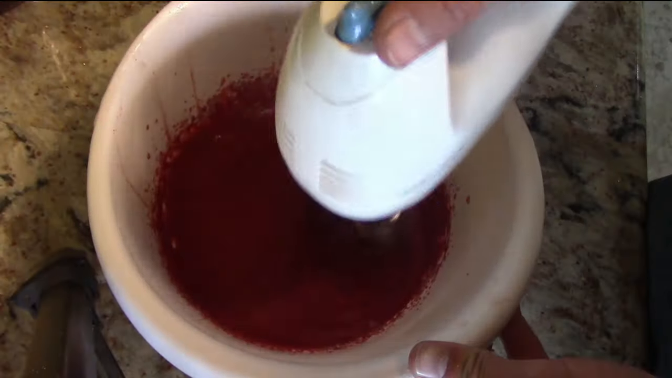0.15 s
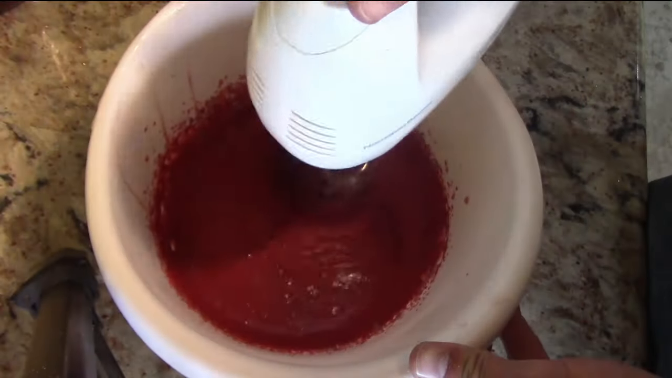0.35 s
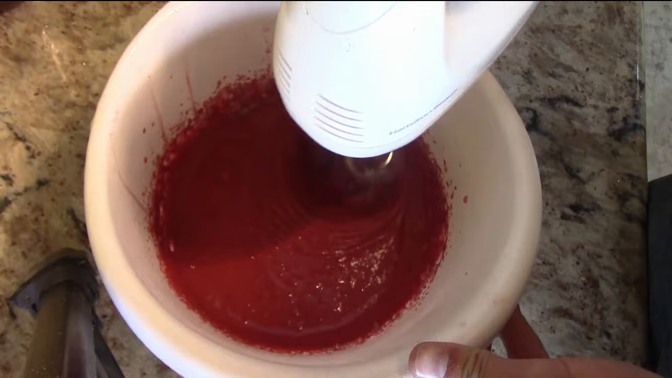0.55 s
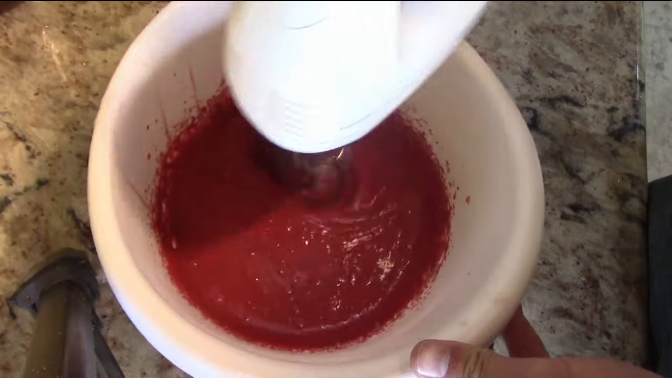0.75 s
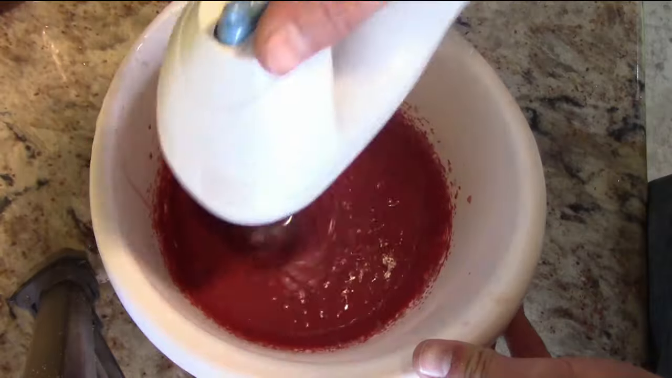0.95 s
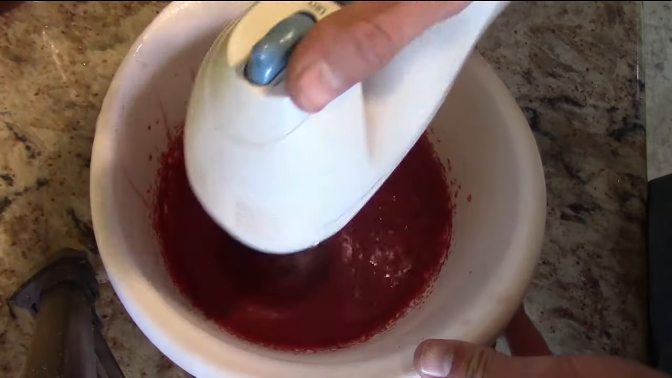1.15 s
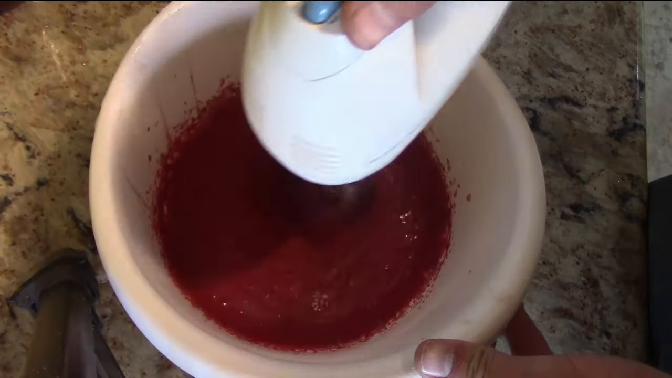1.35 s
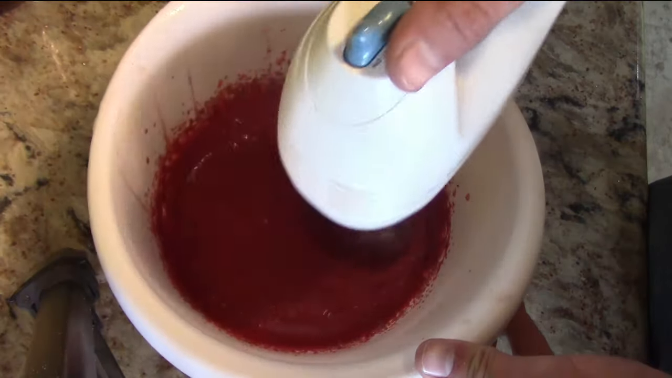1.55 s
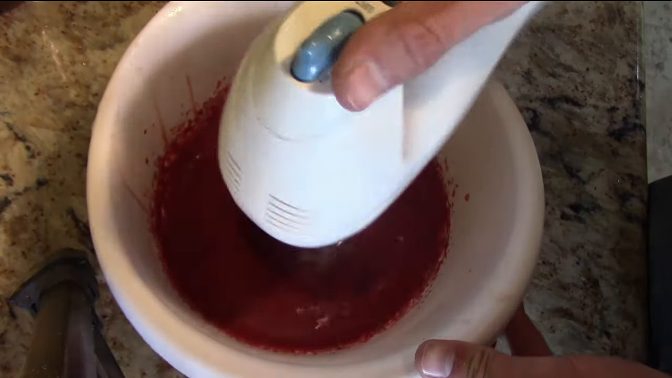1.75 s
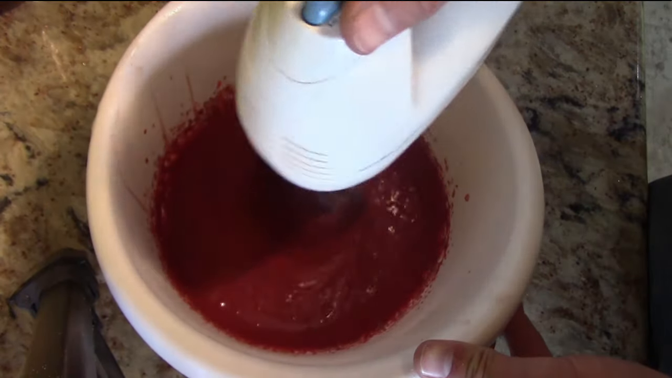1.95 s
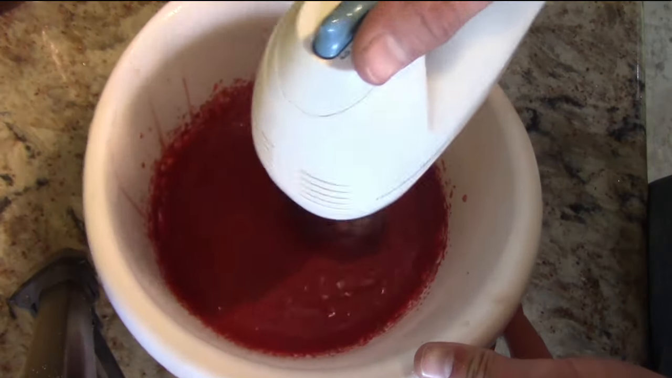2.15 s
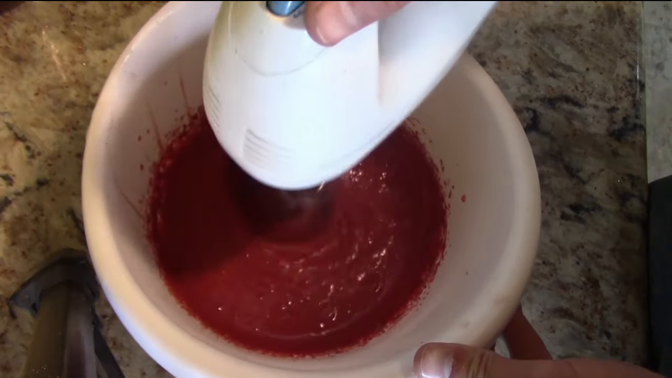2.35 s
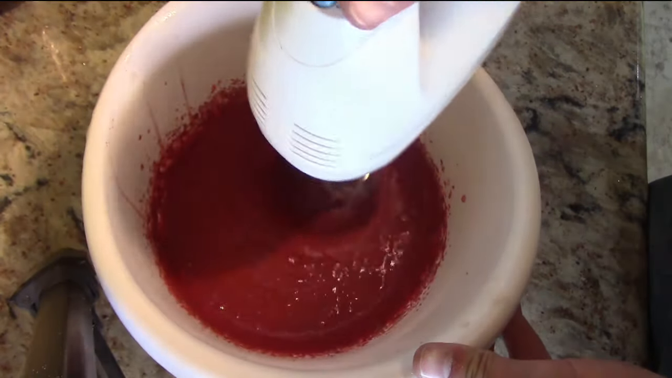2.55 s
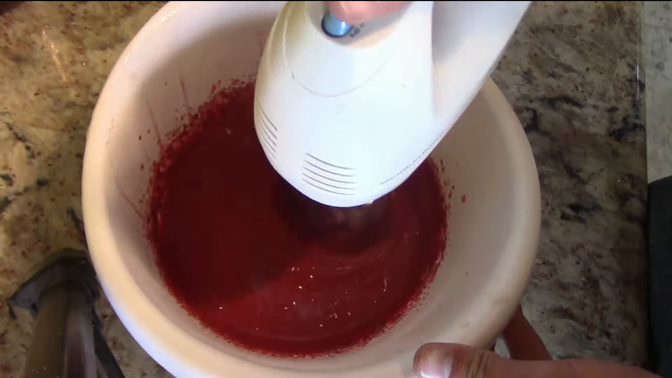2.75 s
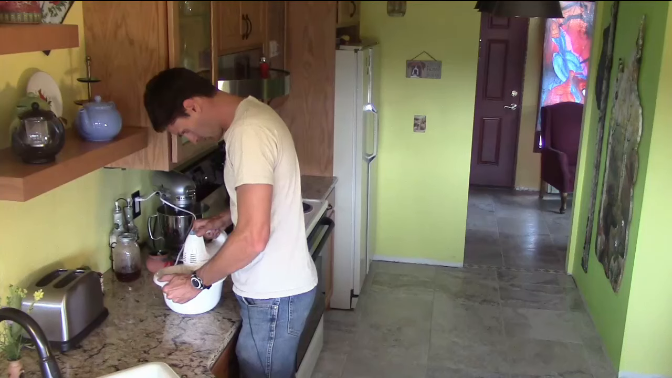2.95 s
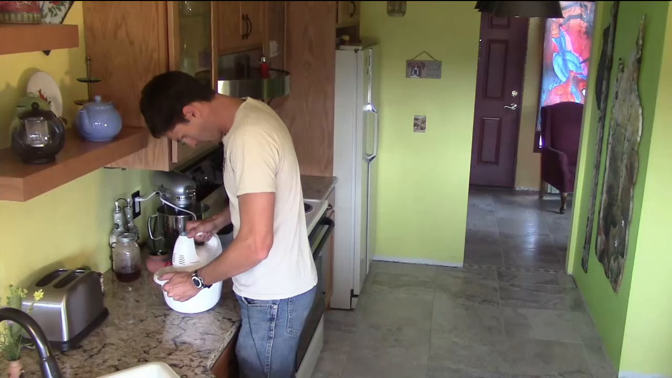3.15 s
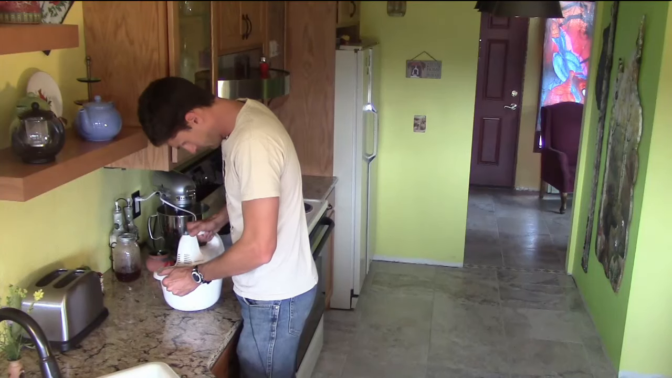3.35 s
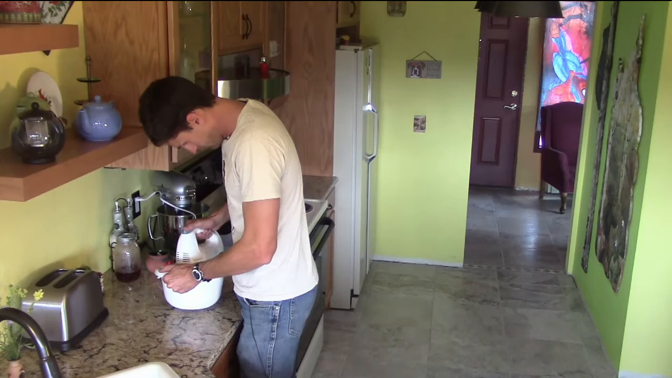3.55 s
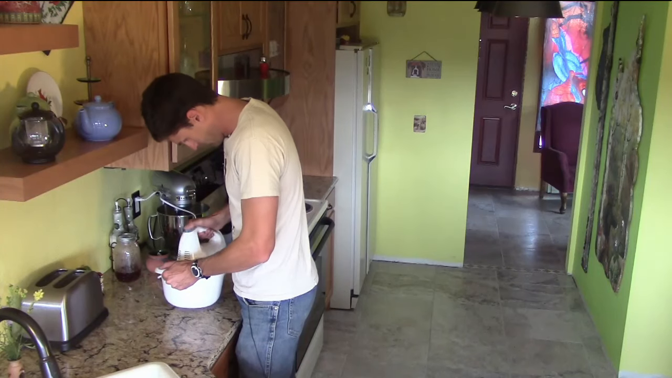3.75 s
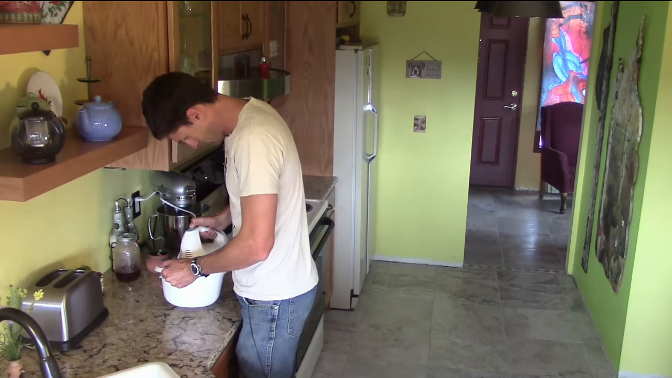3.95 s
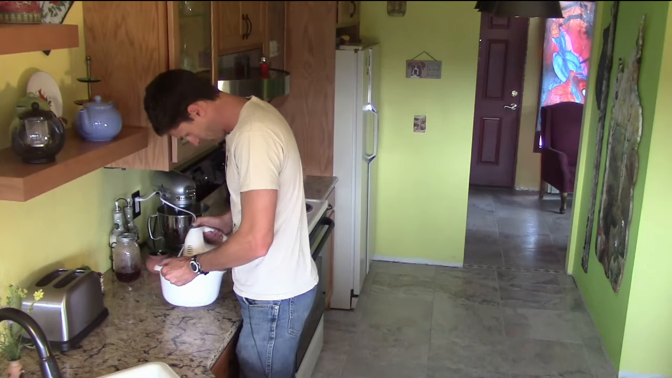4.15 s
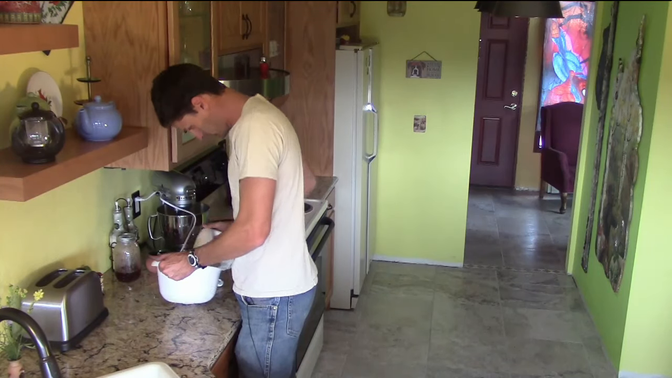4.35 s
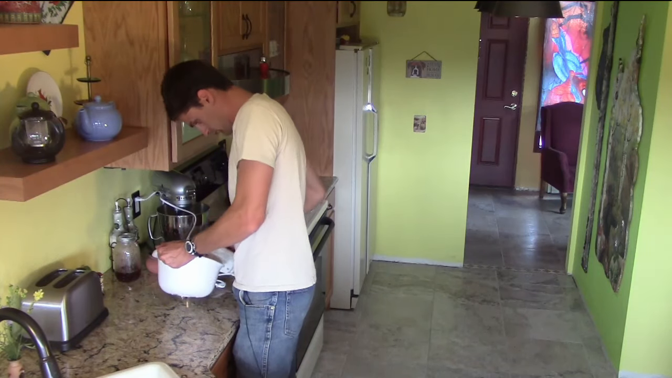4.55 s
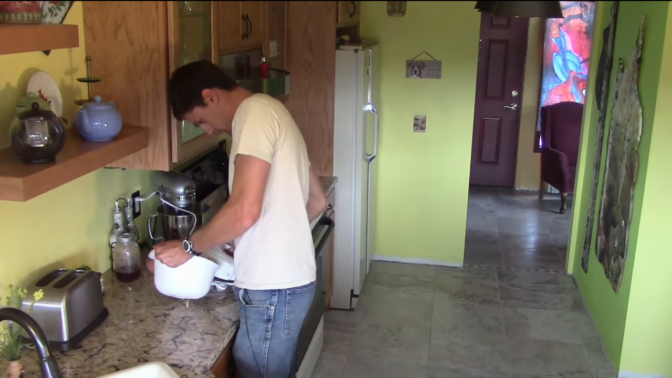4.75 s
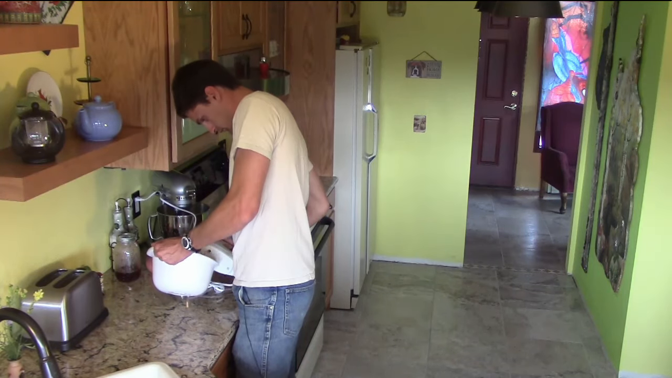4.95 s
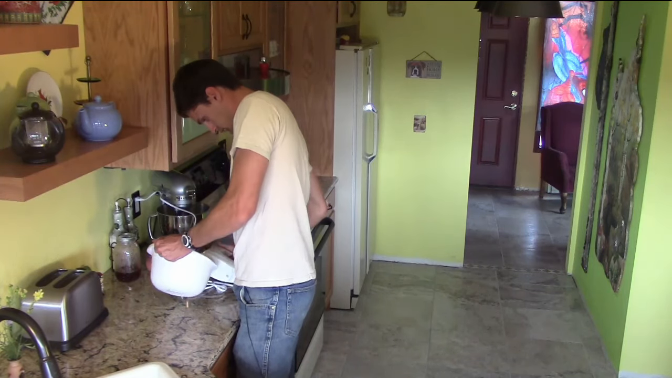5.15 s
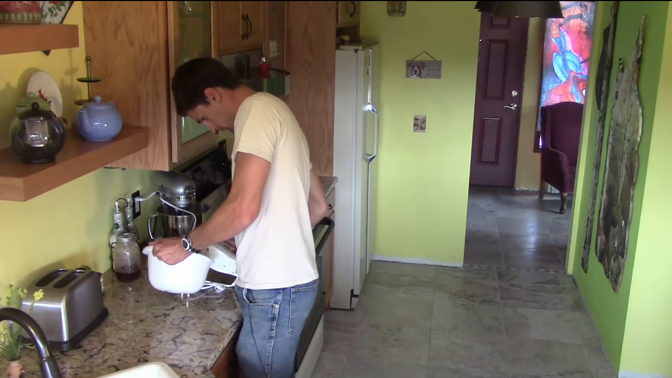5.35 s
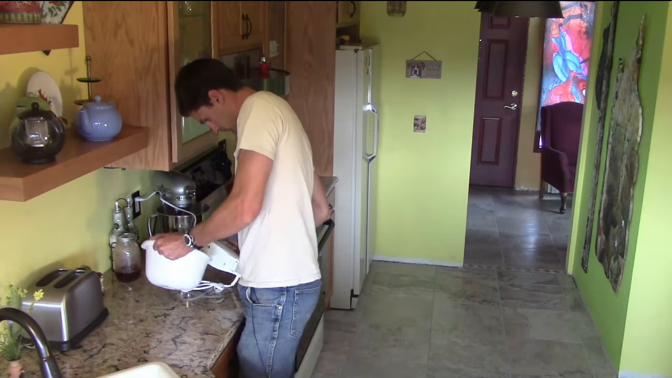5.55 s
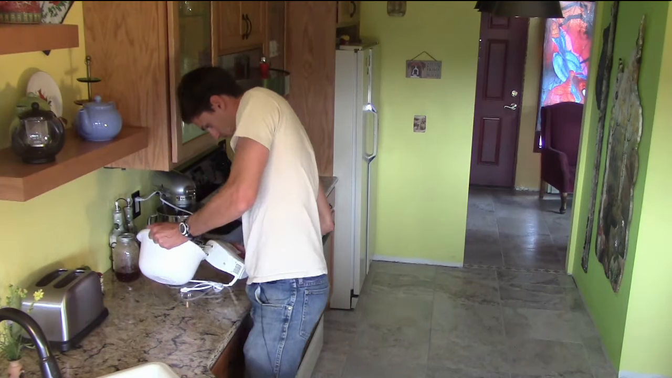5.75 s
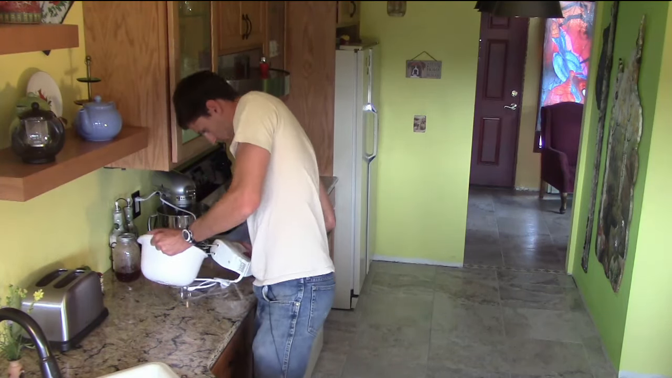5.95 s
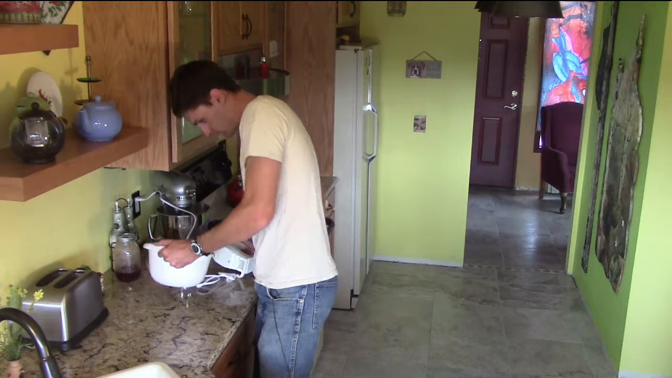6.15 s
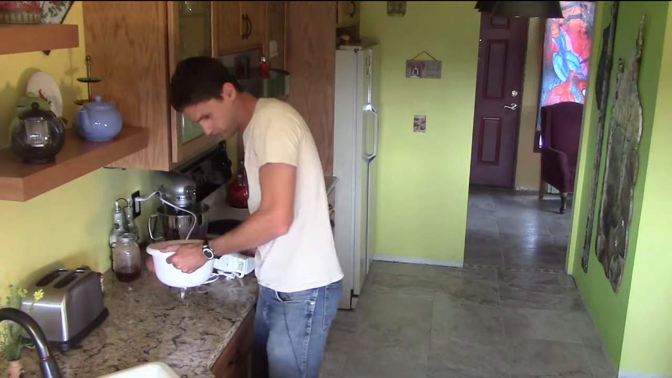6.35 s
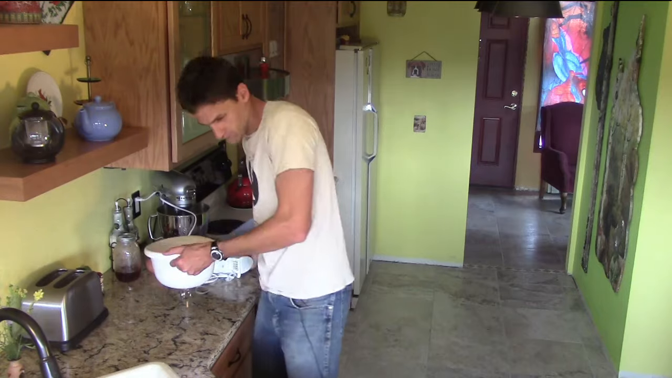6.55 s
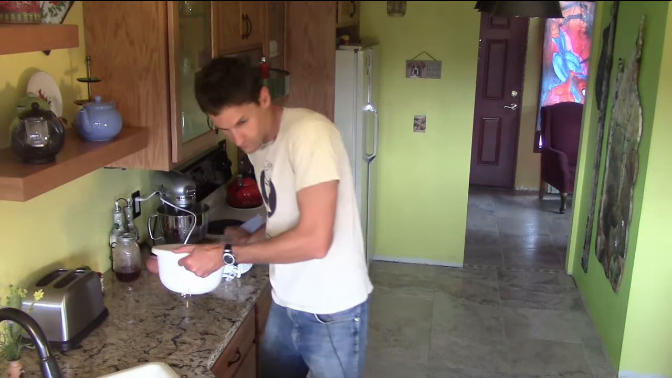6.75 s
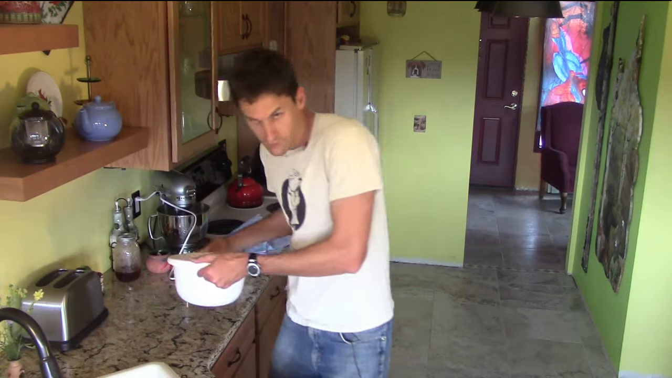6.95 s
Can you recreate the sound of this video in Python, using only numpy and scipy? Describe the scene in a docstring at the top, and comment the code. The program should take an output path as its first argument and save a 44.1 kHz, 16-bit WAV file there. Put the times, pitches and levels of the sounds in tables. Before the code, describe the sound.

Close, buzzy motor hum with rushing air and wavering high whine, heard above a bowl, swells in and holds steady. Around three seconds it gives way to the same mixer across a small lively kitchen. It is turned off and whines downward while clacks begin on the counter; later come a faint squeak, a sharper knock or two and low fabric thumps against the microphone.

```python
"""Hand mixer in a plastic bowl

A mixer beats batter, heard close above the bowl, then cross-faded to a kitchen-wide view where it is
switched off and coasts down. Motors are sums of shaft orders plus coloured air noise; beaters excite wall modes.
Mixer and bowl are set down on stone as short rough pushes into resonant modes and shifted as filtered noise.
Clothing rumbles, rustles and thumps at a single microphone over a faint room hush.
"""
import sys
import numpy as np
from scipy import signal
from scipy.fft import rfft, irfft, next_fast_len
from scipy.io import wavfile
from scipy.ndimage import uniform_filter1d, map_coordinates

SR = 44100
rng = np.random.default_rng(int(sys.argv[2]) if len(sys.argv) > 2 else 0)


def store_pcm(level_fs):
    """Save levels as 16-bit WAV."""
    pcm = np.round(np.clip(level_fs, -1, 1) * 32767).astype(np.int16)
    wavfile.write(sys.argv[1], SR, np.atleast_2d(pcm).T)


def natural_amplitude(level_db):
    """Convert a level in decibels to a linear amplitude factor, elementwise."""
    exponent = np.asarray(level_db, float) / 20
    return 10 ** exponent


N = 312669
LAST_FADE_S = [5.44, 7.26]  # hush and steady clothing rumble: silent, full

# noise colours, scaled to rms 1 in use: freq_hz, relative_density_db
HUSH_COLOUR = [(40, -65), (180, -19), (300, 3), (681, -8), (1750, -14.5), (3920, -22), (8000, -26.5),
               (12400, -32.5), (13200, -49.5)]
CLOTH_COLOUR = [(8.8, -15), (15, 3), (32, -6), (238, -18.5), (402, -30), (530, -34), (600, -39), (780, -62),
                (1320, -120)]
RUSTLE_COLOUR = [(120, -16), (250, 1), (500, -4), (800, -7), (1400, -20), (3000, -34), (8000, -37),
                 (14000, -70)]
SLIDING_COLOUR = [(300, -28), (900, -12), (1500, -4), (2300, -3), (3000, -2), (3750, -2), (4300, -15),
                  (6500, -22), (9000, -35), (15000, -60)]
FAR_AIR_COLOUR = [(40, -54), (120, -30.5), (200, -25.5), (273, -25), (345, -19), (400, -14), (690, -11.5),
                  (859, -9.5), (1030, -7), (1280, -8), (3080, -7), (5220, -19), (8230, -18.5), (15600, -48)]
COASTING_AIR_COLOUR = [(120, -33), (200, -18), (379, -10), (495, -8), (1320, -8.5), (1810, -4), (3760, -15),
                       (4730, -20), (8070, -25.5), (14000, -39.5)]
CLOSE_AIR_COLOUR = [(30, -85), (59, -61), (100, -42.5), (281, -27), (348, -5), (420, -21), (698, -10.5),
                    (844, -12.5), (1060, -6), (2010, -14.5), (2180, -9.5), (3550, -6), (5890, -17),
                    (8260, -17.5), (12900, -25), (15600, -43)]

# kitchen reverberation: freq_hz, t60_s
KITCHEN_DECAY = [(100, 0.19), (800, 0.57), (3000, 0.45), (10000, 0.22)]

# clothing bumping the microphone: middle_s, length_s, level_db
CLOTH_BUMPS = [(3.78, .2, -76), (4.14, 0.12, -70), (4.49, 0.24, -67), (4.82, 0.48, -68), (5.06, 0.092, -55),
               (5.17, 0.28, -69), (5.42, .55, -75.5), (5.66, 0.19, -64.5), (5.8, .2, -65), (6.1, .14, -63),
               (6.22, 0.067, -66), (6.33, .08, -59), (6.6, .16, -52), (6.82, .12, -57)]
# rustling of cloth: middle_s, length_s, level_db
CLOTH_RUSTLES = [(6.31, 0.083, -73), (6.92, .1, -71), (6.985, 0.099, -57.5), (7.05, 0.16, -66.5)]
# a hand on clothing near the microphone: start_s, nominal_peak_db, pitch_hz
CLOTH_THUMPS = [(5.978, -57, 200), (6.093, -54, 90), (6.325, -51.5, 150), (6.348, -46, 258),
                (6.455, -58, 280), (6.903, -49, 380), (6.966, -54, 250)]

# sliding on stone: middle_s, length_s, level_db
STONE_SLIDES = [(5.55, 0.2, -70), (5.69, 0.08, -77), (5.77, 0.16, -74), (5.88, 0.24, -70)]
# squeaks on stone: middle_s, length_s, level_db
STONE_SQUEAKS = [(5.907, 0.027, -65), (5.931, 0.029, -54.5), (5.97, 0.22, -72.5)]
# squeak resonances, applied twice: centre_hz, width_hz, level_db per pass
SQUEAK_MODES = [(1140, 100, -3.5), (1680, 260, -1)]

# knocks: start_s, nominal_peak_db, struck_pitch_hz, thud_db and crack_db re peak before trims
KNOCK_EVENTS = [(4.464, -36.5, 2320, -40, -21), (4.735, -44, 1780, -10, -29), (4.757, -56, 1800, -25, -35),
                (4.814, -29.5, 780, -35, -20.5), (4.832, -40, 700, -29, -13), (5.034, -38.5, 606, -15, -28),
                (5.058, -44, 478, -9, -24), (5.068, -33.5, 494, -26, -19), (5.097, -42, 810, -25, -21),
                (5.11, -36, 830, -25, -19), (5.124, -40, 810, -30, -35), (5.155, -46, 1800, -22, -34),
                (5.202, -39, 595, -20, -20), (5.329, -49, 630, -30, -17), (5.5, -49, 580, -23, -35),
                (5.768, -59, 330, -8, -16), (5.903, -60, 560, -10, -30), (5.976, -64, 400, 0, -30),
                (6.349, -56, 600, -7, -26), (6.377, -58, 1200, -15, -21), (6.407, -43, 720, -29, -5.5),
                (6.48, -40, 776, -22, -21), (6.489, -38, 2350, -27, -9.5), (6.549, -24.5, 1000, -10, -26.5),
                (6.575, -36.5, 1150, -14, -17), (6.629, -46, 1170, -7, -20), (6.891, -54, 568, -16, -19),
                (6.902, -55, 450, -8, -28), (6.963, -52, 650, -9, -23), (6.993, -57, 680, -5, -12),
                (7.035, -69, 2350, -15, -5)]
# bowl and casing on stone, before the struck-pitch tilt: centre_hz, width_hz, level_db
BOWL_MODES = [(306, 60, -1), (406, 53, 0), (563, 79, 0.5), (720, 66, -0.5), (848, 82, 1.5),
              (1080, 200, 0.5), (1420, 160, 3.5), (1822, 110, 3.5), (1980, 130, 3.5), (2350, 280, 0),
              (2790, 260, 1), (3600, 830, -5.5)]
# counter thud: pitch_hz, t60_s
COUNTER_MODES = [(92, .15), (160, .07)]

# distant shaft orders, before colour and wobble: order, powered_db, coasting_db re motor level
FAR_SHAFT_ORDERS = [(1, -10, -11), (2, -16, -14), (3, -15, -19), (4, -14, -18), (6, -14, -13),
                    (7, -28, -15), (8, -21, -20), (9, -14, -15), (10, -18, -7), (11, -20, -24),
                    (12, -24, -20), (20, -36, -17), (24, -45, -9)]
# distant tenth order while the vents face the room: time_s, added_db
FAR_TENTH_GAIN = [(3.1, 2), (3.26, 12), (3.42, 9), (3.52, 0.5)]
# colour of the coasting orders: freq_hz, added_db
FAR_COASTING_COLOUR = [(195, -24), (265, 0), (400, -5), (700, -3), (1000, -10), (1550, -12), (1750, -2),
                       (2150, -2), (2400, -1), (2660, 0), (2800, -6), (2980, -5), (3250, 3), (3400, -12),
                       (3800, -18), (4200, -26)]
# casing resonances in distant air noise: centre_hz, width_hz, gain_db
FAR_CASING_PEAKS = [(493, 82, 5), (1045, 81, 6), (1410, 70, 1.5), (2050, 95, 3), (3150, 210, 4.5)]

# close motor under the changing load of the batter: time_s, shaft_hz
CLOSE_SHAFT_SPEED = [(0, 355.3), (0.25, 354.3), (0.52, 354.9), (0.83, 353.0), (1.22, 354.5), (1.45, 353.5),
                     (1.85, 355.3), (2.6, 356.0), (3.05, 357.6), (3.4, 357.6)]
# close shaft orders, before swells and wobble: order, level_db re motor level
CLOSE_SHAFT_ORDERS = [(2, -15), (3, -22), (4, -24), (6, -23), (8, -25), (9, -24.5), (11, -28), (13, -25),
                      (14, -25)]
# close orders as the hand turns the casing: order, middle_s, length_s, added_db
CLOSE_ORDER_SWELLS = [(2, 1.0, .25, -9), (2, 1.6, .4, -9), (2, 2.25, .3, -10), (3, 1.5, .9, 5),
                      (4, .65, .5, 6), (6, 1.15, .6, 6), (8, 1.76, .55, 11), (11, .66, .45, 10)]
# whines as the hand turns the vents, before wobble: time_s, tenth_db, twelfth_db
VENT_WHINES = [(.62, -47, -52), (.86, -54, -59), (1.05, -48, -55), (1.14, -52, -53), (1.22, -43, -50),
               (1.33, -43.5, -50), (1.39, -54, -52), (1.45, -47, -53), (1.51, -53, -52), (1.56, -43, -50),
               (1.65, -43.5, -50), (1.72, -51, -50), (1.92, -45, -48), (2.06, -51, -49), (2.3, -45, -48),
               (2.5, -45, -52), (2.75, -46.5, -49.5)]
# peaks and dips in close air noise; narrow ones at 575 and 2607 Hz stand for steady motor lines:
# centre_hz, width_hz, gain_db
CLOSE_AIR_PEAKS = [(413, 210, -3.5), (496, 89, 8.5), (575, 17, 9), (858, 43, -8), (1230, 72, -4.5),
                   (1596, 130, 4.5), (2607, 62, 4.5), (2916, 130, -7.5), (3160, 220, 3.5), (4990, 520, 3.5),
                   (8130, 390, 5.5)]
# beaters touching the wall: middle_s, length_s, level_db before +6 dB drum gain
WALL_TOUCHES = [(.16, 0.082, -57.5), (.64, .24, -54), (.75, 0.22, -52), (.85, 0.2, -51.5), (.98, .16, -56),
                (2.48, .16, -58)]
# bowl wall under the beaters: centre_hz, width_hz, level_db
WALL_MODES = [(128, 50, 0), (270, 130, -1), (570, 140, 3.5)]


def unit(x):
    """Scaled to rms 1."""
    return x / np.sqrt(np.mean(x ** 2) + 1e-20)


def along(points, hz):
    """(Hz, value) points interpolated on a log frequency axis."""
    point_hz, value = np.transpose(points)
    return np.interp(np.log(hz + 1), np.log(point_hz + 1), value)


def curves(rows):
    """One interpolated curve for each column after the time."""
    time_s, *columns = np.transpose(rows)
    return [np.interp(np.arange(N) / SR, time_s, column) for column in columns]


def wobble(rate_hz):
    """A smooth random curve, rate_hz knots a second."""
    knots = rng.standard_normal(int(N * rate_hz / SR) + 4)
    return map_coordinates(knots, [np.arange(N) * rate_hz / SR])


def fade(times_s):
    """Equal-power gain from silent to full, and back if four times are given."""
    position = np.interp(np.arange(N) / SR, times_s, [0, 1, 1, 0][:len(times_s)])
    return np.sin(np.pi / 2 * position)


def swells(rows):
    """Gain of smooth (middle_s, length_s, level_db) swells, added in power."""
    t = np.arange(N) / SR
    power = 0
    for middle_s, length_s, level_db in rows:
        phase = np.pi * np.clip((t - middle_s) / length_s, -.5, .5)
        power = power + (natural_amplitude(level_db) * np.cos(phase) ** 2) ** 2
    return np.sqrt(power)


def filtered(x, response):
    """x times a complex response of frequency."""
    m = next_fast_len(len(x) + 8192)
    return irfft(rfft(x, m) * response(np.fft.rfftfreq(m, 1 / SR)), m)[:len(x)]


def resonances(modes):
    """Causal response of (centre_hz, width_hz, level_db) modes of alternating sign."""
    def response(f):
        total = 0
        for k, (centre_hz, width_hz, level_db) in enumerate(modes):
            damping = 1j * f * width_hz
            total = total + (-1) ** k * natural_amplitude(level_db) * damping / (centre_hz ** 2 - f * f + damping)
        return total
    return response


def peaks(modes):
    """Gain with a bump or dip at each (centre_hz, width_hz, gain_db)."""
    return lambda f: natural_amplitude(sum(db / (1 + ((f - c) / w * 2) ** 2) for c, w, db in modes))


def rush(colour, patchy_db):
    """Coloured noise of rms 1 with time-frequency patches of random gain."""
    z = signal.stft(rng.standard_normal(N + 512), nperseg=512)[2]
    patches = uniform_filter1d(rng.standard_normal(z.shape), 6, 0)
    patches = uniform_filter1d(patches, 12, 1)
    x = signal.istft(z * natural_amplitude(patchy_db * unit(patches)), nperseg=512)[1][:N]
    return unit(filtered(x, lambda hz: natural_amplitude(along(colour, hz))))


def kitchen(x, level_db):
    """The sound plus a fresh noise tail in which each frequency dies at its own speed."""
    hz, t, z = signal.stft(rng.standard_normal(SR // 2), SR, nperseg=256)
    decay = natural_amplitude(-60 * t / along(KITCHEN_DECAY, hz)[:, None])
    tail = signal.istft(z * decay, SR, nperseg=256)[1]
    response = np.pad(natural_amplitude(level_db) * tail / np.linalg.norm(tail), (200, 0))
    response[0] = 1
    return signal.fftconvolve(x, response)


def room_hush():
    """Room noise: one layer fades in, a steady duller one lies 12.5 dB lower before its low-pass."""
    hush_db = -69.5
    hush = natural_amplitude(hush_db) * fade(LAST_FADE_S) ** 0.75 * rush(HUSH_COLOUR, patchy_db=1.5)
    dull = filtered(rush(HUSH_COLOUR, patchy_db=3.5), lambda f: 1 / (1 + (f / 6000) ** 2))
    return hush + natural_amplitude(hush_db - 12.5) * dull


def clothing_rumble():
    """Lumpy low noise of clothing on the microphone, in bumps over a steady level that fades in."""
    steady_db = -56.5
    gain = np.hypot(swells(CLOTH_BUMPS), natural_amplitude(steady_db) * fade(LAST_FADE_S))
    return gain * unit(natural_amplitude(1.8 * wobble(22)) * rush(CLOTH_COLOUR, patchy_db=3.0))


def cloth_rustle():
    """Cloth rustles as noise with a rapidly varying level."""
    return swells(CLOTH_RUSTLES) * unit(natural_amplitude(4.8 * wobble(70)) * rush(RUSTLE_COLOUR, patchy_db=1.5))


def thumps():
    """Each thump is a low swing that dies within about two cycles."""
    t = np.arange(N) / SR
    out = np.zeros(N)
    for start_s, peak_db, pitch_hz in CLOTH_THUMPS:
        cycles = np.clip(t - start_s, 0, None) * pitch_hz
        attack = 1 - np.exp(-cycles / .15)
        out -= natural_amplitude(peak_db + 7 - 13 * cycles) * np.sin(2 * np.pi * cycles) * attack
    return out


def sliding():
    """Things sliding on stone make uneven band-limited noise."""
    return swells(STONE_SLIDES) * unit(natural_amplitude(1.3 * wobble(60)) * rush(SLIDING_COLOUR, patchy_db=2.5))


def squeaks():
    """Squeaks on stone are noise passed twice through a pair of resonances."""
    noise = rng.standard_normal(N)
    return swells(STONE_SQUEAKS) * unit(filtered(noise, lambda f: resonances(SQUEAK_MODES)(f) ** 2))


def knocks():
    """Each contact is a short rough push into the modes nearest the struck pitch, with a low thud and a crack."""
    out, t = np.zeros(N + SR), np.arange(SR // 4) / SR
    for start_s, peak_db, struck_hz, thud_db, crack_db in KNOCK_EVENTS:
        modes = []
        for hz, width_hz, level_db in BOWL_MODES:
            tilt_db = -5.5 * abs(np.log2(hz / struck_hz))
            modes.append((hz * rng.uniform(.97, 1.03), width_hz, level_db + tilt_db))
        push = natural_amplitude(-60 * t / 0.04) * rng.standard_normal(len(t))
        push[round(.0008 * SR)] += 11  # the blow itself, ahead of most of its rattle
        spot = resonances([(struck_hz, 220, 2)])
        body = resonances([(struck_hz, 1.2 * struck_hz, -4)])

        def struck(f):
            soft = (1.6 * struck_hz / (1.6 * struck_hz + 1j * f)) ** 2
            return (resonances(modes)(f) + body(f) * soft) * (1 + spot(f))

        ring = filtered(push, struck)
        ring = ring / np.abs(ring).max()
        thud = sum(natural_amplitude(-60 * t / t60_s) * np.sin(2 * np.pi * hz * t) for hz, t60_s in COUNTER_MODES)
        thud = natural_amplitude(thud_db - 2) * thud * (1 - np.exp(-t / .004))
        crack = filtered(rng.standard_normal(len(t)),
                         lambda f: (1j * f / (1350 + 1j * f)) ** 2 * (6500 / (6500 + 1j * f)) ** 6)
        crack = natural_amplitude(crack_db + 7.5 - 60 * t / 0.036) * unit(crack)
        attack = 1 - np.exp(-t / 0.00073)
        wet = kitchen(natural_amplitude(peak_db) * (ring + thud + crack) * attack, level_db=-7)
        out[round(start_s * SR):][:len(wet)] += wet
    return out[:N]


def far_mixer():
    """The motor across the kitchen: after switch-off the orders slide down through a colour and the air changes."""
    switch_off_s, running_hz = 3.925, 348.6
    coast_s, friction_hz = 1.29, 158  # speed + friction_hz decays with time constant coast_s
    motor_db, coast_db_per_s, coast_lag_s = -49.5, -23, 0.1  # the fall gathers pace over the lag
    since_off = np.clip(np.arange(N) / SR - switch_off_s, 0, None)
    shaft_hz = (running_hz + friction_hz) * np.exp(-since_off / coast_s) - friction_hz
    shaft_hz = np.clip(shaft_hz, 0, None)
    fall_db = coast_db_per_s * since_off ** 2 / (since_off + coast_lag_s)
    level = fade([2.81, 4.15]) ** 0.94 * natural_amplitude(motor_db + fall_db) * np.clip(shaft_hz / 15, 0, 1)
    turn = 2 * np.pi * np.cumsum(shaft_hz) / SR
    coasting = np.clip(since_off / 0.1, 0, 1)
    tenth_db, = curves(FAR_TENTH_GAIN)
    tones = 0
    for order, on_db, off_db in FAR_SHAFT_ORDERS:
        colour_db = along(FAR_COASTING_COLOUR, order * shaft_hz)
        order_db = on_db + coasting * (off_db - on_db + colour_db)
        order_db = order_db + (2.2 - 1.2 * coasting) * wobble(18)
        if order == 10:
            order_db = order_db + tenth_db
        jitter = (0.55 - .3 * coasting) * wobble(25)
        tones = tones + natural_amplitude(order_db) * np.sin(order * turn + jitter)
    fast = np.clip((shaft_hz - 150) / 190, 0, 1) ** 0.99
    air = np.sqrt(fast) * rush(FAR_AIR_COLOUR, patchy_db=1.5)
    air = air + np.sqrt(1 - fast) * rush(COASTING_AIR_COLOUR, patchy_db=3.5)
    air = unit(filtered(air, peaks(FAR_CASING_PEAKS)))
    return kitchen(level * np.sqrt(2) * tones, level_db=-8)[:N] + level * natural_amplitude(-.5) * air


def bowl_drum():
    """Beater wires passing the wall make irregular impulses that excite its modes; scaled to rms 1."""
    strikes = np.diff(np.floor(np.cumsum(46 + 8 * wobble(20)) / SR), prepend=0)  # about 46 per s
    push = strikes * rng.uniform(.4, 1, N) + 0.05 * rng.standard_normal(N)
    return unit(filtered(push, lambda f: resonances(WALL_MODES)(f) * (1j * f / (60 + 1j * f)) ** 4))


def close_mixer():
    """Shaft orders and cooling air, throbbing with the mains; the beaters drum on the bowl."""
    motor_db, mains_ripple_hz = -37, 120
    shaft_db, touch_load_db = -10.5, 0.5  # re motor level; a touch loads the shaft tone
    shaft_hz, = curves(CLOSE_SHAFT_SPEED)
    turn = 2 * np.pi * np.cumsum(shaft_hz) / SR
    ripple = np.sin(2 * np.pi * mains_ripple_hz * np.arange(N) / SR)
    touch = swells(WALL_TOUCHES)
    pressed = np.sqrt(touch / touch.max())

    shaft_gain = natural_amplitude(shaft_db + touch_load_db * pressed + 1.16 * wobble(7.98))
    tones = shaft_gain * np.sin(turn) * (1 + 0.2 * ripple + .3 * (ripple ** 2 - .5))
    tenth_db, twelfth_db = curves(VENT_WHINES)
    for order, whine_db in (10, tenth_db), (12, twelfth_db):
        gain = natural_amplitude(whine_db - motor_db + .7 * wobble(30))
        tones = tones + gain * np.sin(order * turn + .15 * wobble(30)) * (1 + .3 * ripple)
    for order, order_db in CLOSE_SHAFT_ORDERS:
        turned_db = 0
        for swell_order, middle_s, length_s, added_db in CLOSE_ORDER_SWELLS:
            if swell_order == order:
                turned_db = turned_db + added_db * swells([(middle_s, length_s, 0)])
        gain = natural_amplitude(order_db + turned_db + 1.8 * wobble(15))
        tones = tones + gain * np.sin(order * turn + 0.015 * order * wobble(30)) * (1 + 0.17 * ripple)
    # the small casing radiates little below the shaft tone
    tones = filtered(tones, lambda f: 1 / (1 + (290 / (f + 1)) ** 12))

    air = unit(filtered(rush(CLOSE_AIR_COLOUR, patchy_db=1.1), peaks(CLOSE_AIR_PEAKS)))
    air = air * (1 + .09 * ripple + .12 * np.sin(turn))
    motor = natural_amplitude(motor_db) * (np.sqrt(2) * tones + natural_amplitude(-1.67) * air)
    drum_gain = np.hypot(natural_amplitude(6) * touch, natural_amplitude(motor_db - 30))  # batter drums on the wall between touches
    return fade([-0.1609, 0.51, 2.5, 3.29]) * (motor + drum_gain * bowl_drum())


def scene():
    """One microphone feeds both channels."""
    handling = clothing_rumble() + cloth_rustle() + thumps() + sliding() + squeaks()
    mono = room_hush() + handling + knocks() + far_mixer() + close_mixer()
    return np.array([mono, mono])


def low_pass(x):
    """Removes everything above the highest recorded frequency."""
    return signal.sosfilt(signal.butter(12, 15720, fs=SR, output="sos"), x)


def record(dry):
    """Both channels are cut off sharply at 15720 Hz."""
    mix = np.array([filtered(x, lambda f: f < 15720) for x in dry])
    return low_pass(mix)


dry = scene()
out = record(dry)
store_pcm(out)
```